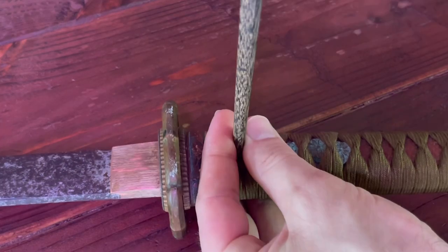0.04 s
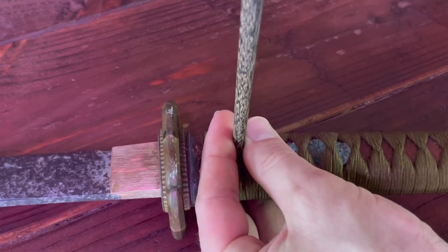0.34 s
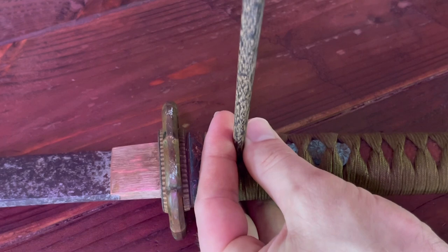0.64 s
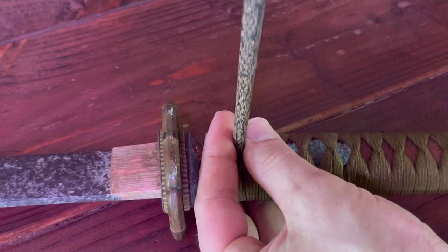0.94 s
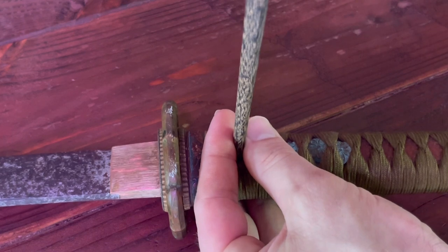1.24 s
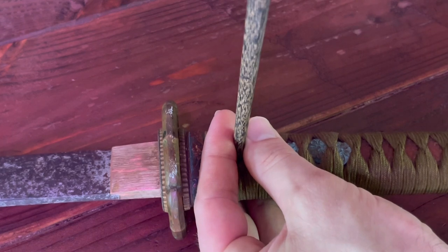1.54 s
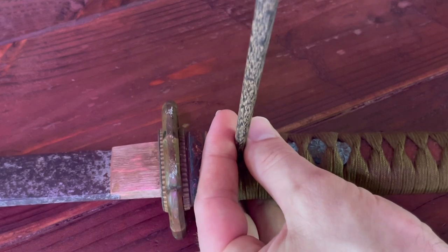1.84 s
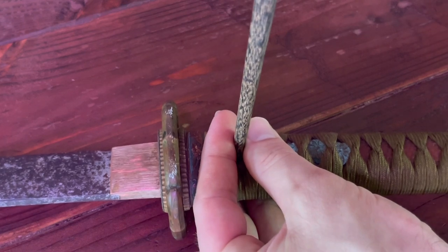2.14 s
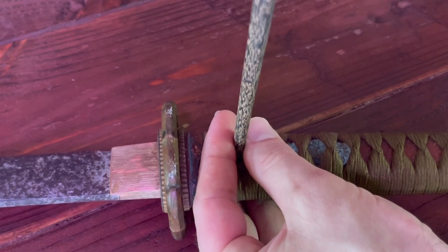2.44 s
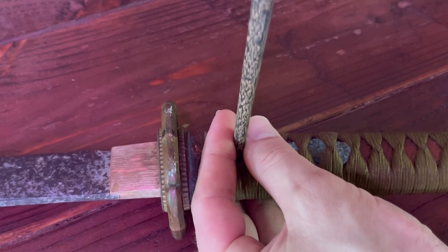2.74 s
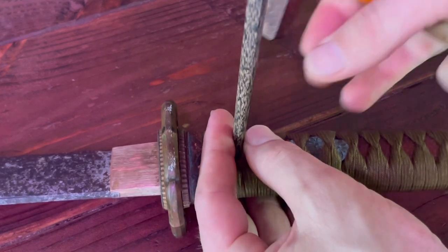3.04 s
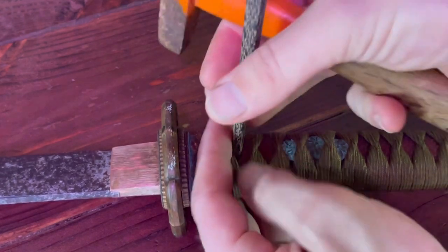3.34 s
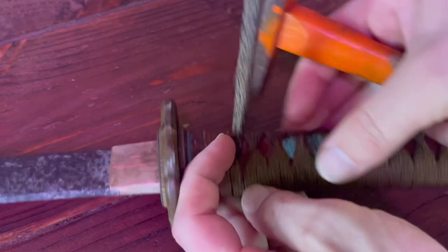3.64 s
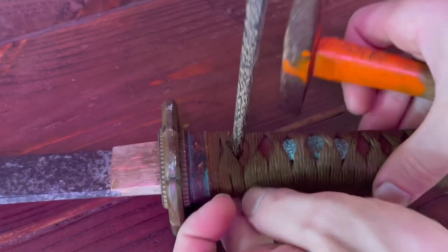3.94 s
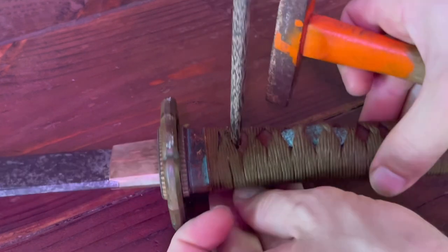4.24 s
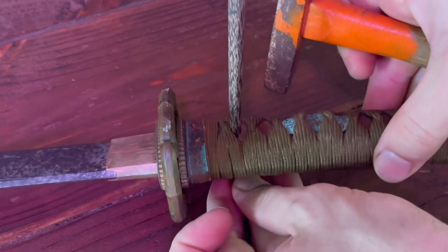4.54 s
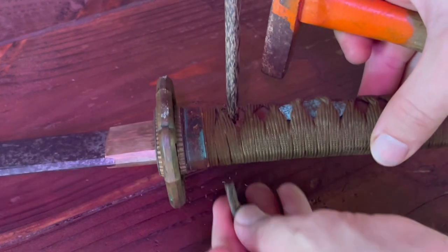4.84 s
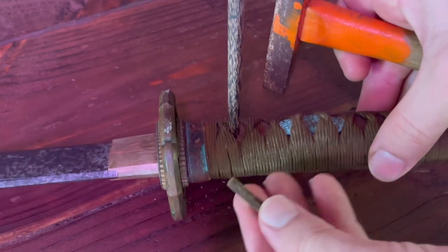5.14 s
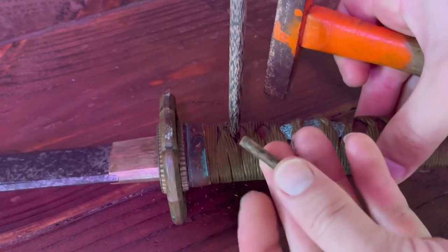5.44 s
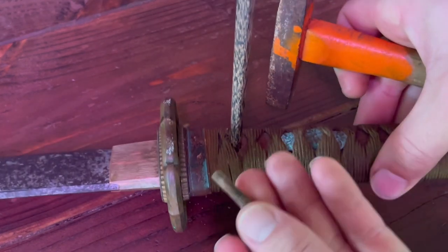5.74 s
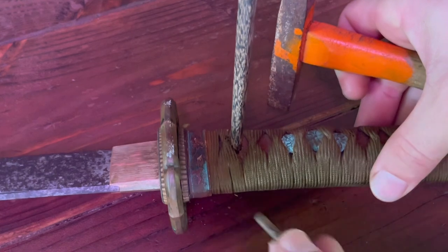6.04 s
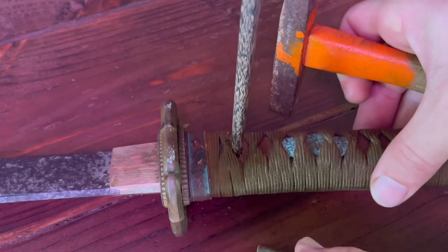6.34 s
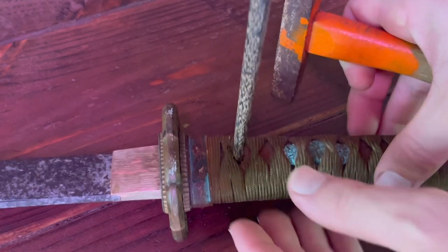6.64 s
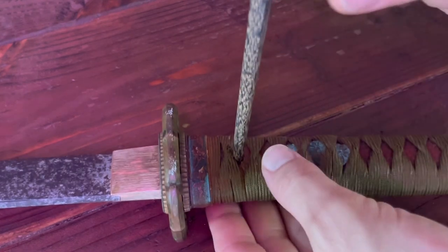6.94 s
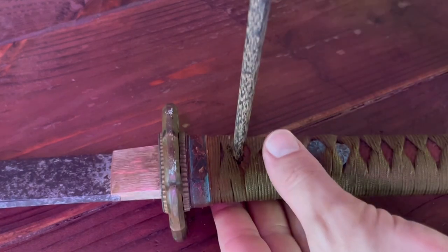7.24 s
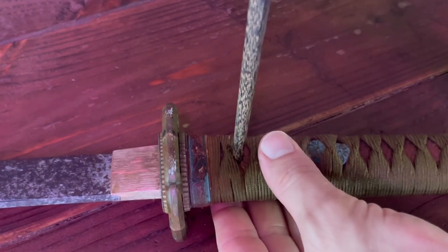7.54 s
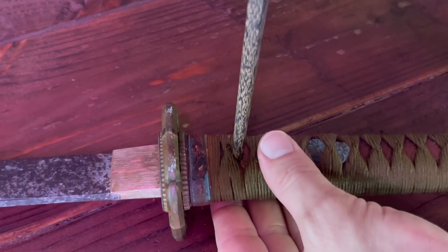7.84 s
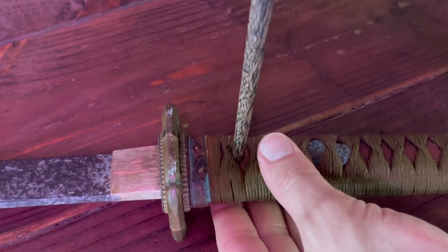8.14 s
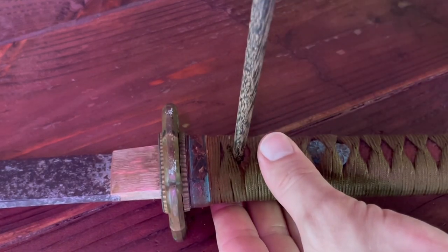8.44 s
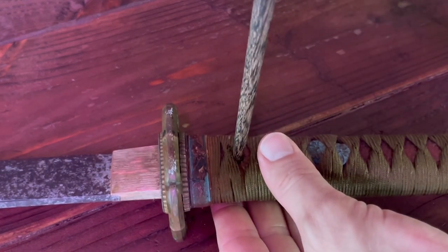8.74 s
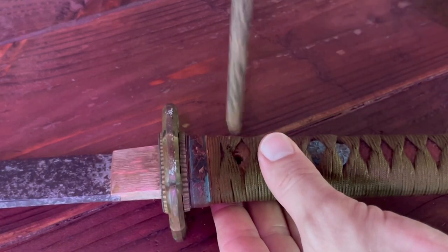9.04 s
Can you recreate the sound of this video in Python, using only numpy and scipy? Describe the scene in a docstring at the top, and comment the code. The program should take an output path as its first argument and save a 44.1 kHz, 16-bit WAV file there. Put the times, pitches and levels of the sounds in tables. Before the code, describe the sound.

Close by at an outdoor wooden table, seven steady hammer blows land on a steel punch, the last three loudest, each with a bright crack, a woody thud and a clack from a sword's guard. Muffled knocks and light metal clicks follow as the sword is handled. Two sharper clicks and a faint scrape come near the end, with a low rumble and soft hiss underneath.

```python
"""At a plank table outdoors, a small hammer drives a steel punch against the peg in a sword hilt.
Seven blows make the steel crack and ring, the planks boom and the sword's guard bounce.
Then the hilt is shifted with soft knocks, the loose peg and the tools click, and the punch scrapes free.
A faint rumble and hiss lie under it all."""
import sys
import numpy as np
from scipy import signal
from scipy.fft import rfft, irfft, next_fast_len
from scipy.io import wavfile
from scipy.ndimage import uniform_filter1d, minimum_filter1d

SR = 44100
rng = np.random.default_rng(int(sys.argv[2]) if len(sys.argv) > 2 else 0)


def unload_wav(signal):
    """Save mono or channel-first audio to the path in sys.argv[1] as 16-bit WAV at rate SR, clipped to [-1, 1]."""
    wavfile.write(
        sys.argv[1],
        SR,
        np.round(np.clip(np.atleast_2d(signal).T, -1, 1) * 32767).astype(np.int16),
    )


N = 405279

# Hammer blows. The guard lands twice after each; its delays count from the blow.
# start_s, crack_db, thud_db, boom_db, ring_hz, ring_db, first_delay_s, second_delay_s, second_landing_db
HAMMER_BLOWS = [(.1755, -.5, 3, 2, 6750, -23, .017, .045, -20),
                (.5095, 0, 4, 5, 6110, -20, .0165, .044, -9), (.851, -2.5, 0, 1, 5520, -24, .016, .040, -4),
                (1.1995, 0, 1.5, 5, 5880, -20, .018, .045, -18),
                (1.5615, 7, 5.5, 5, 6110, -10, .0165, .044, -12),
                (1.939, 8, 6, 5, 7486, -14, .015, .040, -3),
                (2.3378, 6.5, 3.5, 5, 5800, -7.5, .005, .046, -1)]
# Soft knocks of the hilt on the table; the last row is the planks knocked as the punch catches while scraping
# free. A lower cutoff sounds more muffled. # start_s, level_db, boom_db, cutoff_hz, touch_count,
# second_touch_delay_s, second_touch_loss_db
HILT_KNOCKS = [(2.892, -13.5, -10.5, 380, 1, 0, 0), (3.637, -13, -4, 320, 4, .111, 10),
               (5.005, -18, -20, 125, 1, 0, 0), (5.183, -20, -11, 270, 1, 0, 0),
               (6.448, -22, -15, 240, 1, 0, 0), (6.512, -21, -13.5, 310, 2, .094, 8),
               (6.837, -24, -14, 320, 4, .095, 0), (8.876, -31, -17, 420, 2, .03, -1)]
# Clicks of peg and tools; the first row is the sword's guard landing on metal: start_s, level_db, low_hz,
# high_hz, fade_s, knock_db
TOOL_CLICKS = [(.1955, -1, 3000, 15000, .012, -40), (2.745, -43, 7000, 15000, .05, -60),
               (4.258, -35, 1500, 4000, .045, -30), (6.348, -25, 2500, 14000, .035, -55),
               (6.840, -18, 550, 7000, .022, -33), (6.870, -25, 6000, 14000, .02, -50),
               (6.929, -28, 1400, 4000, .035, -45), (8.0235, -35, 2500, 14000, .025, -29),
               (8.6285, -10, 4300, 15000, .016, -31), (8.6725, -15, 1000, 15000, .008, -28)]

# The tones a struck thing rings with: pitch_hz, level_db, fade_s (the time to drop by 60 dB)
TABLE_BOOM_TONES = [(86, -16.5, .27), (102, -18, .11), (124, -23, .22), (146, -28, .25)]
PLANK_TONES = [(243, -32, .2), (278, -29, .33), (368, -21, .16), (416, -12, .16), (587, -27, .14),
               (729, -23, .13), (832, -27, .14), (988, -24, .12), (1395, -33, .15), (1938, -27, .1),
               (2100, -30, .14), (2590, -33, .07)]
STEEL_TONES = [(2757, -33, .08), (5520, -32, .06), (5883, -32, .08), (6110, -30, .07), (6746, -33, .08),
               (7486, -33, .08), (8915, -33, .08), (10930, -31, .07)]   # punch and hammer head
HOLLOW_HILT_TONES = [(760, -12, .12), (1750, -16, .1), (2050, -17, .1), (2650, -15, .1), (3500, -18, .08)]

# Noise colours, or how strong each noise is from bass to treble: pitch_hz, level_db
OUTDOOR_COLOUR = [(20, -48), (45, -29), (70, -27), (125, -29), (190, -37), (300, -43), (600, -45.5),
                  (1300, -49), (2300, -50), (4000, -55.5), (7500, -56), (11300, -60), (12300, -88),
                  (16000, -105)]
METAL_CLICK_COLOUR = [(500, -4), (1400, -4), (2600, -3.5), (3800, -4), (5000, -7), (6500, -4), (9000, -5),
                      (11500, -8), (13500, -30), (15500, -18), (17000, -32)]
GUARD_CLACK_COLOUR = [(150, -14), (400, -2), (900, -3), (1400, -8), (2000, -2), (3000, -13), (6000, -21),
                      (11500, -26), (13500, -50)]
WOOD_THUD_COLOUR = [(30, -32), (60, -11), (100, 2), (190, -3), (400, 5), (510, -2), (700, .5), (1000, -2.5),
                    (1400, -10), (2200, -13), (4000, -28), (12000, -50)]
STEEL_CRACK_COLOUR = [(200, -30), (900, -17), (1800, -12), (3000, -11), (3900, -10), (4900, -9),
                      (6000, -6.5), (7300, -11), (9000, -9), (11300, -8), (12400, -21), (13600, -38),
                      (15200, -24), (17000, -42)]
NEAR_ECHO_COLOUR = [(60, -50), (400, -45), (1200, -39.5), (2200, -40), (4000, -44.5), (9000, -43),
                    (13000, -47)]
ECHO_TAIL_COLOUR = [(60, -49), (150, -44), (400, -50), (1200, -44), (2200, -46.5), (4000, -53),
                    (8000, -53.5), (13000, -60)]

# How long the wood and the echoes take to die away: pitch_hz, fade_s
WOOD_FADES = [(80, .16), (400, .13), (1000, .12), (3000, .08)]
ECHO_FADES = [(80, 1.3), (300, .75), (1500, .68), (6000, .7), (12000, .5)]

# How alike a noise is on the left and right: pitch_hz, likeness (1 means the same)
STEREO_LIKENESS = [(60, .99), (170, .98), (290, .72), (640, .65), (1400, .25), (2600, .94), (7000, .93),
                   (12000, .93)]
# How much later the treble reaches the microphone's left opening: pitch_hz, lag_radians
MIC_LEFT_LAG = [(20, 0), (7500, 0), (8700, .5), (9400, 1.9), (10300, 3.2), (11600, 5.6), (12700, 7.2),
                (15000, 10.5)]
# How much louder the left side is: pitch_hz, left_minus_right_db
MIC_LEFT_BOOST = [(100, 2), (380, .3), (700, 2.3), (1300, 2.1), (2400, -.2), (12000, -.2)]
# The microphone's treble, with a small peak and a dull top: pitch_hz, gain_db
MIC_TREBLE = [(8500, 0), (9500, 2.5), (10400, 4), (11500, 1), (12200, -1), (13400, -14), (15000, -11),
              (17000, -13)]


def from_db(db):
    """Turn decibels into a number to multiply a sound by."""
    return 10 ** (np.asarray(db) / 20)


def at_hz(points, hz):
    """Look up a table at any pitch, sliding between its rows octave by octave."""
    pitches, values = np.transpose(points)
    return np.interp(np.log(np.maximum(hz, 1)), np.log(pitches), values)


def add(track, start_s, sound):
    """Mix a sound into a track."""
    at = int(round(start_s * SR))
    track[:, at:at + sound.shape[-1]] += sound[..., :N - at]


def cut(x, hz, keep, order=2):
    """Keep the "low" or the "high" side of a pitch and turn the rest down."""
    return signal.sosfilt(signal.butter(order, hz, keep, fs=SR, output="sos"), x + 1e-18)


def filtered(x, response):
    """Change the strength and timing of each pitch as response(hz) says."""
    size = next_fast_len(x.shape[-1] + SR // 2, real=True)
    return irfft(rfft(x, size) * response(np.fft.rfftfreq(size, 1 / SR)), size)[..., :x.shape[-1]]


def noise(colour, size):
    """Noise of a given colour, partly alike on the left and right."""
    hz = np.fft.rfftfreq(size, 1 / SR)
    mid, side = rfft(rng.standard_normal((2, size)))
    alike = at_hz(STEREO_LIKENESS, hz)
    pair = np.sqrt((1 + alike) / 2) * mid + np.sqrt((1 - alike) / 2) * side * [[1], [-1]]
    return irfft(pair * from_db(at_hz(colour, hz)), size)


def fade(fade_s, size):
    """A curve that drops by 60 dB every fade_s seconds."""
    return np.exp(-np.log(1000) * np.arange(size) / SR / fade_s)


def burst(colour, fade_s, size=8192):
    """Countless close tones, struck at once, blur into a fading noise."""
    return noise(colour, size) * fade(fade_s, size)


def uneven_burst(colour, fades, size=16384):
    """A burst of noise in which each octave dies away at its own speed."""
    spectrum, hz = rfft(noise(colour, size)), np.fft.rfftfreq(size, 1 / SR)
    octaves_hz = np.geomspace(60, 15360, 9)
    shares = [at_hz(np.c_[octaves_hz, one], hz) for one in np.eye(len(octaves_hz))]
    return sum(irfft(spectrum * share, size) * fade(at_hz(fades, octave_hz), size)
               for octave_hz, share in zip(octaves_hz, shares))


def ring(tones, scatter_db, rise_s, size=20000):
    """A struck thing's clear tones build up and fade, each with a slightly random strength."""
    t = np.arange(size) / SR
    hz, db, fade_s = np.transpose(tones)[:, :, None]
    strength = from_db(db + scatter_db * rng.standard_normal(db.shape))
    waves = np.sin(2 * np.pi * (hz * t + rng.random(hz.shape)))
    return (strength * waves * fade(fade_s, size)).sum(axis=0) * (1 - np.exp(-t / rise_s))


def bending(x, lag_s):
    """Low pitches travel slower through a thing that bends, so 100 Hz comes about lag_s late."""
    def response(hz):
        slowness = np.maximum(np.sqrt(100 / np.maximum(hz, 50)) - np.sqrt(100 / 9000), 0)
        return np.exp(-2j * np.pi * np.cumsum(lag_s * slowness) * hz[1])
    return filtered(x, response)


def background(hum_hz=124, waver_hz=2.0, grows_from_s=6.5, rumble_db_per_s=1.2, hiss_db_per_s=2.0):
    """A distant rumble with a wavering hum, and a soft hiss; all slowly grow near the end."""
    t = np.arange(N) / SR
    air = noise(OUTDOOR_COLOUR, size=next_fast_len(N, real=True))[:, :N]
    rumble = cut(air, 250, "low", order=1)
    hiss = air - rumble
    moments_s = np.linspace(0, N / SR, num=90)
    waver, swell = (np.interp(t, moments_s, drift) for drift in rng.standard_normal((90, 2)).T)
    hum = from_db(-52 + 2.5 * swell) * np.sin(2 * np.pi * np.cumsum(hum_hz + waver_hz * waver) / SR)
    grown_s = np.maximum(t - grows_from_s, 0)
    rumble_gain = from_db(-1.2 + rumble_db_per_s * grown_s)
    hiss_gain = from_db(-1.5 + hiss_db_per_s * grown_s)
    return rumble_gain * (rumble + hum) + hiss_gain * hiss


def punch_scrape(free_s=8.915, rise_db_per_s=170, fall_db_per_s=600, size=8192):
    """The punch catches on the rim of the hole in tiny slips, harder and harder until it comes free."""
    t = (np.arange(size) - size / 2) / SR   # zero as it comes free
    slips_db = 4 * np.repeat(rng.standard_normal(size // 64), 64)
    pressure_db = -41 + np.minimum(rise_db_per_s * t, -fall_db_per_s * t)
    track = np.zeros((2, N))
    add(track, free_s + t[0], from_db(pressure_db + slips_db) * noise(METAL_CLICK_COLOUR, size))
    return track


def plank_ring():
    """Struck planks ring with a few clear, woody tones."""
    return from_db(-2) * ring(PLANK_TONES, scatter_db=1.5, rise_s=.003)


def table_boom():
    """The table's deepest tones swell a little more slowly."""
    return ring(TABLE_BOOM_TONES, scatter_db=.8, rise_s=.006)


def soft_knock(level_db, boom_db, cutoff_hz):
    """A padded touch wakes only the low tones of the planks."""
    planks = plank_ring() + burst(WOOD_THUD_COLOUR, fade_s=.12, size=20000)
    return from_db(level_db) * cut(planks, cutoff_hz, "low") + from_db(boom_db) * table_boom()


def metal_click(low_hz, high_hz, fade_s, size=8192):
    """Bare metal touches: a short bright tick, with a hollow ring that the hand stops."""
    tick = burst(METAL_CLICK_COLOUR, fade_s, size)
    hollow = ring(HOLLOW_HILT_TONES, scatter_db=1.5, rise_s=.0005, size=size) * fade(2 * fade_s, size)
    return cut(cut(tick + hollow, low_hz, "high"), high_hz, "low")


def handling(rock_gap_s=.08, rock_loss_db=2.5):
    """The hilt is set down and rocks to rest; peg and tools click and knock lightly on the planks."""
    wood, metal = np.zeros((2, 2, N))
    for start_s, level_db, boom_db, cutoff_hz, touches, delay_s, loss_db in HILT_KNOCKS:
        add(wood, start_s, soft_knock(level_db, boom_db, cutoff_hz))
        for k in range(round(touches) - 1):
            rock = from_db(-loss_db - k * rock_loss_db) * soft_knock(level_db, boom_db, cutoff_hz)
            add(wood, start_s + delay_s + k * rock_gap_s, rock)
    for start_s, level_db, low_hz, high_hz, fade_s, knock_db in TOOL_CLICKS:
        add(metal, start_s, from_db(level_db) * metal_click(low_hz, high_hz, fade_s))
        add(wood, start_s, soft_knock(knock_db, boom_db=knock_db + 4, cutoff_hz=800))
    return bending(wood, lag_s=.014) + metal


def guard_clack(level_db):
    """The sword's guard lands after a hop with a short clack."""
    return from_db(level_db) * burst(GUARD_CLACK_COLOUR, fade_s=.045)


def steel_crack(fade_s, chatter_db=2.5, size=8192):
    """Hammer and punch rattle together and ring; the force jumps about once a millisecond."""
    force = from_db(chatter_db * np.repeat(rng.standard_normal(size // 32), 32))
    force /= np.sqrt(np.mean(force ** 2))
    crack = force * burst(STEEL_CRACK_COLOUR, fade_s, size)
    return crack + ring(STEEL_TONES, scatter_db=3.0, rise_s=.0005, size=size)


def hammering(settle_s=.076):
    """Steel cracks on steel, the planks take the blow, and the guard hops and lands twice."""
    steel, wood, rattle = np.zeros((3, 2, N))
    for k, blow in enumerate(HAMMER_BLOWS):
        start_s, crack_db, thud_db, boom_db, ring_hz, ring_db, first_s, second_s, second_db = blow
        # As the peg loosens, the blows get shorter and more direct, and the punch sings on more freely.
        looseness = k / (len(HAMMER_BLOWS) - 1)
        crack_fade_s = np.interp(looseness, (0, 1), (.11, .055))
        thud_s = start_s + np.interp(looseness, (0, 1), (.007, .001))
        linger_db = np.interp(looseness, (0, 1), (-62, -38))
        add(steel, start_s, from_db(crack_db) * steel_crack(crack_fade_s))
        # Where the hammer lands decides which tone of the punch sings out.
        punch_tones = [(ring_hz, ring_db, .055), (ring_hz, ring_db + linger_db, .6)]
        add(steel, start_s, ring(punch_tones, scatter_db=.5, rise_s=.0005))
        add(wood, thud_s, from_db(thud_db) * uneven_burst(WOOD_THUD_COLOUR, WOOD_FADES))
        add(wood, thud_s, from_db(thud_db) * plank_ring() + from_db(boom_db) * table_boom())
        add(rattle, start_s + first_s, guard_clack(-1 + .6 * thud_db))   # heavier thud, harder landing
        add(rattle, start_s + second_s, guard_clack(second_db))
        punch_tick = cut(burst(METAL_CLICK_COLOUR, fade_s=.035), 3000, "high")
        add(rattle, start_s + settle_s, from_db(-25) * punch_tick)
    # An earlier blow is still dying away at the start.
    earlier_blow = uneven_burst(WOOD_THUD_COLOUR, ECHO_FADES, size=32768)
    add(rattle, 0, from_db(-16) * cut(earlier_blow, 170, "low", order=1))
    return bending(steel, lag_s=.008) + bending(wood, lag_s=.016) + rattle


def echoes(x, rise_s=.012, size=49152):
    """Quick echoes from near surfaces and a longer, blurred tail build up just after each sound."""
    tail = uneven_burst(ECHO_TAIL_COLOUR, ECHO_FADES, size)
    near = burst(NEAR_ECHO_COLOUR, fade_s=.22, size=size)
    build_up = 1 - np.exp(-np.arange(size) / SR / rise_s)
    return signal.fftconvolve(x.mean(axis=0)[None], (tail + near) * build_up, axes=1)[:, :N]


def scene(echo_db=1.2):
    """The work on the table, its echoes and the background."""
    work = hammering() + handling() + punch_scrape()
    return work + from_db(echo_db) * echoes(work) + background()


def limiter(x, ceiling_db=-1.0, hold_s=.004, recover_db_per_s=70):
    """The volume dips just ahead of each peak that is too loud, then comes back."""
    over_db = np.maximum(20 * np.log10(abs(x).max(axis=0) + 1e-9) - ceiling_db, 0)
    held_db = -minimum_filter1d(-over_db, int(hold_s * SR))
    ramp_db = recover_db_per_s * np.arange(N) / SR
    dip_db = np.maximum.accumulate(held_db + ramp_db) - ramp_db
    return x * from_db(-uniform_filter1d(dip_db, size=80))


def record(dry, bass_cut_hz=52, treble_cut_hz=17200):
    """A microphone with two openings hears it; deep bass, loud peaks and the highest treble are cut."""
    def openings(hz):
        lean = from_db(at_hz(MIC_LEFT_BOOST, hz) / 2)
        left = lean * np.exp(-1j * at_hz(MIC_LEFT_LAG, hz))
        return from_db(at_hz(MIC_TREBLE, hz)) * np.array([left, 1 / lean])
    limited = limiter(cut(filtered(dry, openings), bass_cut_hz, "high"))
    return signal.sosfilt(signal.cheby2(14, 70, treble_cut_hz, fs=SR, output="sos"), limited)


dry = scene()
out = record(dry)
unload_wav(out)
```